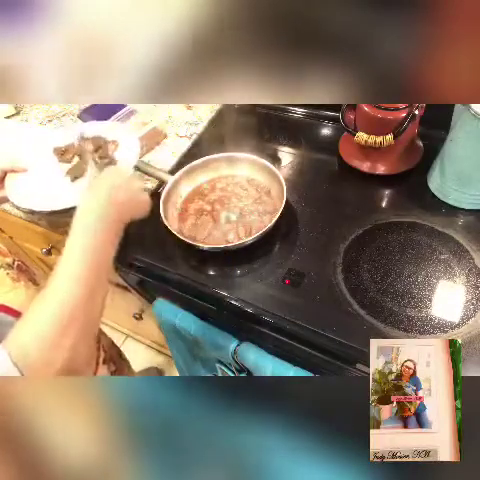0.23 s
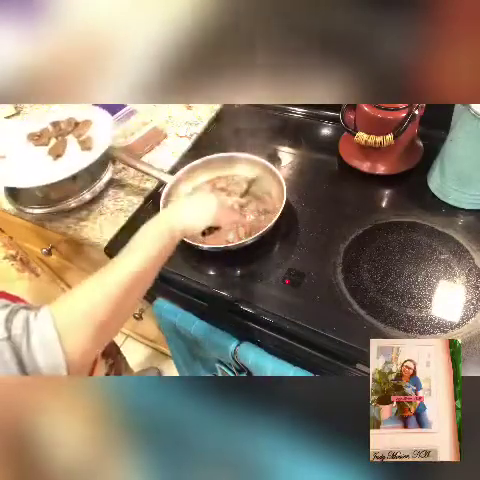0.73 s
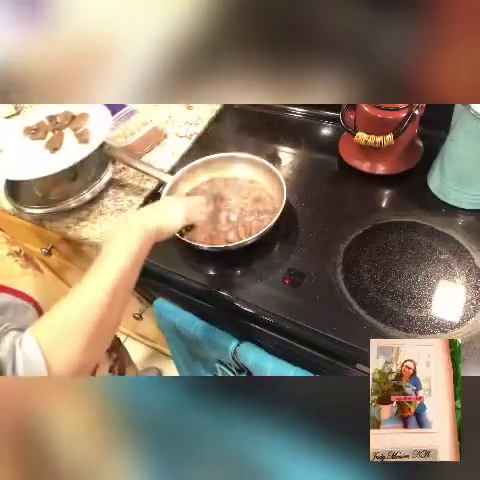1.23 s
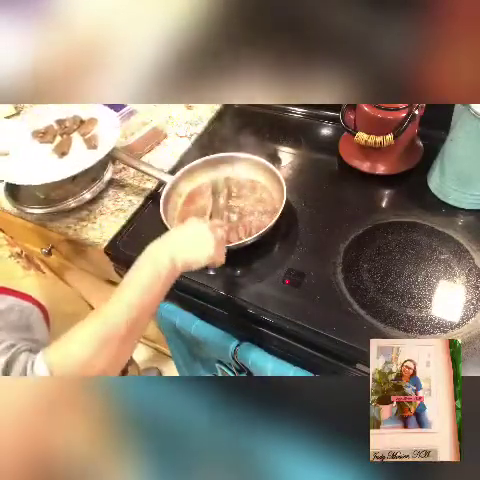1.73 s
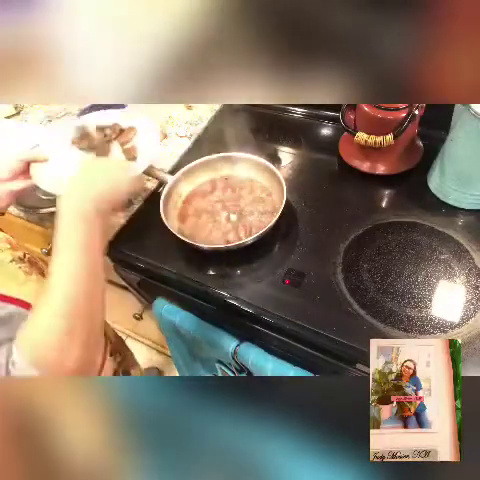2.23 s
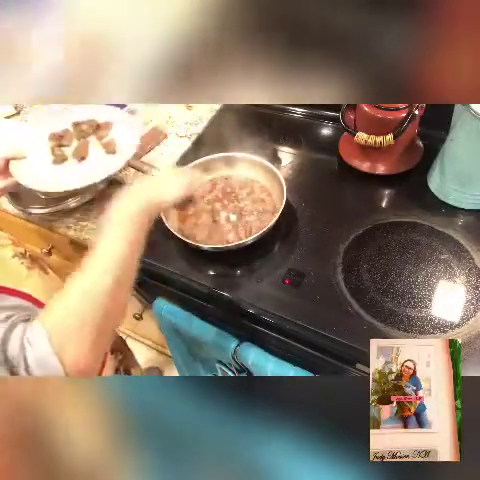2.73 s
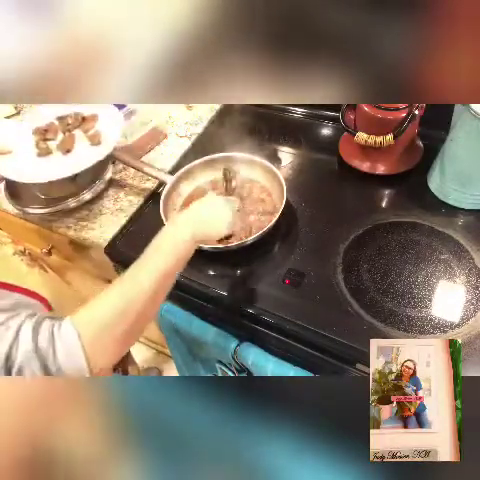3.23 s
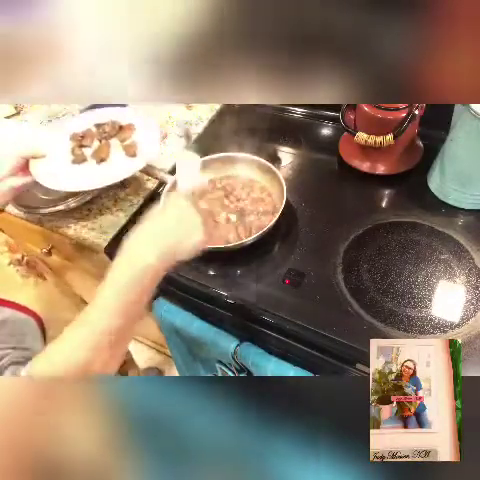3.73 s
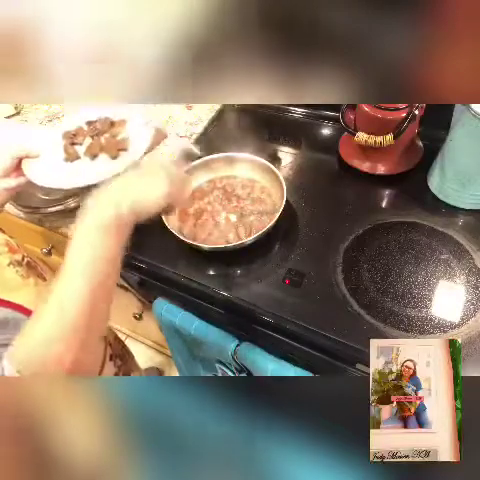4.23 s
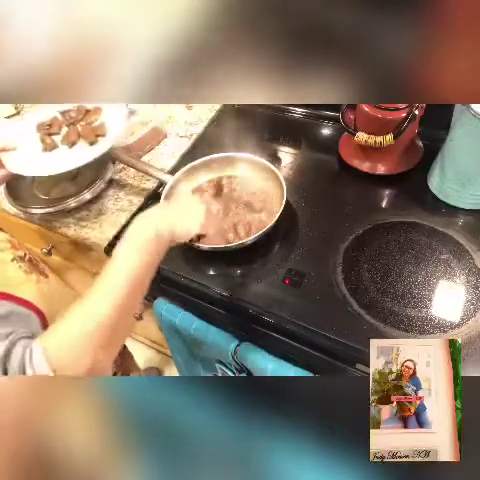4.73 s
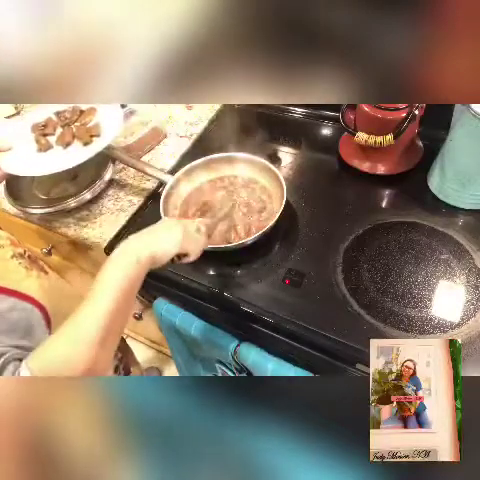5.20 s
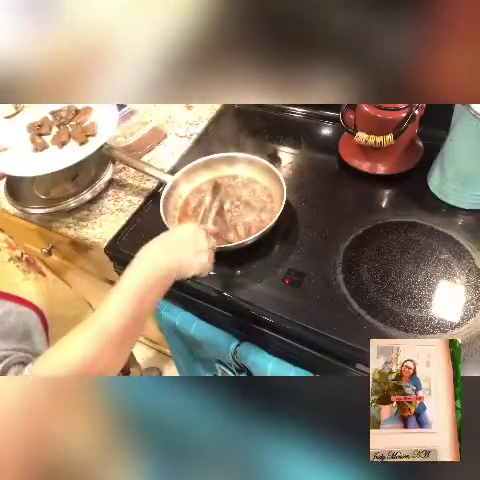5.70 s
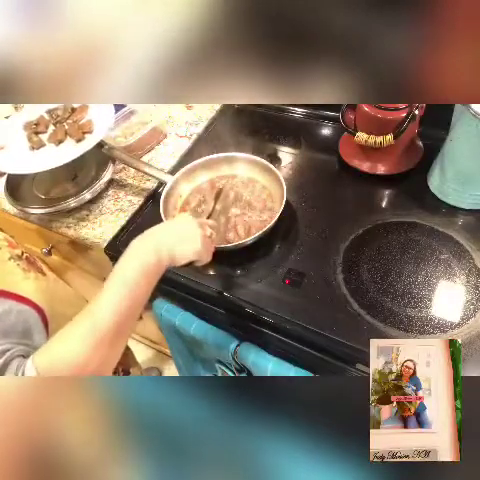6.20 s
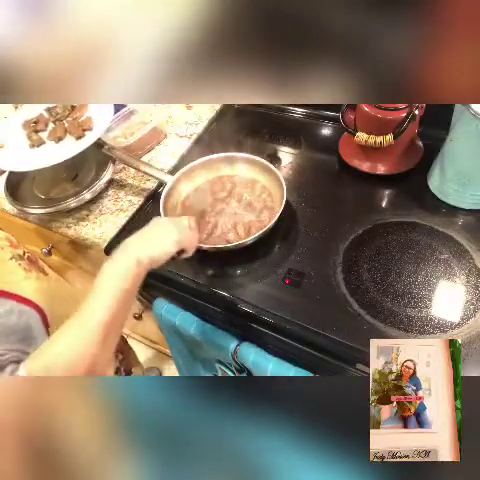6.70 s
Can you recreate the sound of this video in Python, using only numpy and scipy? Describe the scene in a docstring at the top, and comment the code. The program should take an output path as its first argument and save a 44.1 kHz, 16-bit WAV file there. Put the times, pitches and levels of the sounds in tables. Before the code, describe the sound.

In a small kitchen, steel tongs click sharply on a frying pan in irregular bursts, with quiet sizzling and low room noise beneath.

```python
"""Steel tongs move meat from a china plate into a skillet in a small kitchen, over low room noise and hum.
Oil sizzles faintly throughout as bursting bubbles, with stray spits as short broad resonances.
First the tongs knock once on the plate, whose damped modes ring, and the oil soon flares up.
Then they tap the skillet (crack, clatter, ringing steel, pan wall, hob thud) and at times scrape over it.
Near the end a faint, rising low tone swells twice."""
import sys
import numpy as np
from scipy import signal
from scipy.fft import rfft
from scipy.io import wavfile
from scipy.ndimage import uniform_filter1d

SR = 44100
rng = np.random.default_rng(int(sys.argv[2]) if len(sys.argv) > 2 else 0)


def log_audio(samples):
    """Write samples as a 16-bit WAV file to the path given in sys.argv[1]."""
    # one column per channel
    frames = np.atleast_2d(samples).T
    # limit to full scale, then quantise
    limited = np.clip(frames, -1, 1)
    pcm = np.round(limited * 32767).astype(np.int16)
    wavfile.write(sys.argv[1], SR, pcm)


N = 306495
TIME = np.arange(N) / SR   # time in the scene (s)
AGE = np.arange(SR // 2) / SR   # time since a contact (s)


def from_db(db):
    """Level and amplitude: 20 dB is a factor of ten in gain."""
    return 10 ** (np.asarray(db) / 20)


def rms_one(x):
    """Normalisation: scale to unit rms."""
    return x / np.sqrt(np.mean(x ** 2) + 1e-20)


def at_hz(points, hz):
    """Logarithmic frequency scale: interpolate a table along it."""
    f, value = np.transpose(points)
    return np.interp(np.log(np.maximum(hz, 1)), np.log(f), value)


def colour(x, spectrum, tilt_db=0):
    """Spectral shaping: multiply by a spectrum, tilted by so many dB an octave; unit rms."""
    hz = np.maximum(np.fft.rfftfreq(len(x), 1 / SR), 1)
    gain = from_db(at_hz(spectrum, hz) + tilt_db * np.log2(hz))
    return rms_one(np.fft.irfft(rfft(x) * gain, len(x)))


def dying(t60, rise=1e-5):
    """Exponential decay: builds while the contact lasts, then falls 60 dB in each t60."""
    return (1 - np.exp(-AGE / rise)) * np.exp(-np.log(1000) * AGE / t60)


def swell(start, length, attack, t60):
    """Envelope: rises linearly over the attack, holds until the length is up, then decays exponentially."""
    rise = np.clip((TIME - start) / attack, 0, 1)
    return rise * np.exp(-np.log(1000) * np.maximum(TIME - start - length, 0) / t60)


def add(track, s, sound):
    """Superposition: add a sound to the track at time s."""
    start = max(round(s * SR), 0)
    track[start:start + len(sound)] += sound[:max(N - start, 0)]


def even_noise(envelope, width_hz):
    """Spectral whitening: under the envelope, every band of this width carries about the same energy."""
    noise = rng.standard_normal(len(AGE))
    bins = max(int(width_hz * len(AGE) / SR), 1)
    for _ in range(2):
        power = uniform_filter1d(np.abs(rfft(noise * envelope)) ** 2, bins)
        noise = np.fft.irfft(rfft(noise) / np.sqrt(power), len(AGE))
    return rms_one(noise)


def crowd(spectrum, t60, rise, tilt_db=0):
    """High modal density: modes too dense to tell apart act as noise, struck and dying together."""
    envelope = dying(t60, rise)
    noise = even_noise(envelope, width_hz=450)
    return colour(noise, spectrum, tilt_db) * envelope


SCATTER_DB = 1   # standard deviation of each mode's level from strike to strike


def ring(modes, rise, favoured_hz=None):
    """Modal superposition: damped sines; the point of contact may favour modes near one pitch."""
    hz, db, t60 = np.transpose(modes)[:, :, None]
    db = db + SCATTER_DB * rng.standard_normal(hz.shape)
    if favoured_hz:
        octaves_away = np.log2(hz / favoured_hz)
        db = db + 8 / (1 + (octaves_away / 0.077) ** 2)
    sines = np.sin(2 * np.pi * (hz * AGE + rng.random(hz.shape)))   # random phases
    return np.sum(from_db(db) * dying(t60, rise) * sines, axis=0)


def grains(per_s, spread_db):
    """Poisson-like impulses: random clicks of either sign, most of them small and a few large."""
    sizes = from_db(spread_db * np.minimum(rng.exponential(1, N), 5)) * rng.choice([-1, 1], N)
    return sizes * (rng.random(N) < per_s / SR)


def tick(centre_hz, octaves, t60):
    """Heavily damped resonance: a tiny contact or burst makes one broad spectral hump."""
    hz = np.geomspace(100, SR / 2, num=40)
    hump = -10 * np.log10(1 + (np.log2(hz / centre_hz) / octaves) ** 4)
    return crowd(np.column_stack([hz, hump]), t60, rise=0.00027, tilt_db=-2.0)


# spectrum of the room noise: f/Hz, level per Hz/dB
AIR_SPECTRUM = [(27, -38), (45, 5), (90, -5), (125, 1), (200, -10), (330, -4), (460, -14), (750, -6.5),
                (900, 0.5), (1130, -6.5), (1420, -2.5), (1950, -10.5), (3000, -9), (8000, -23.5)]
# swells of a faint low tone: start t/s, length/s, level/dB
TONE_SWELLS = [(5.72, .23, -67.5), (6.11, 0.35, -65)]
TONE_HZ, TONE_RISE_HZ_PER_S = 273, 23   # pitch as the first swell starts, and its steady rise
TONE_ATTACK_S, TONE_RELEASE_T60_S = 0.05, .5


def background():
    """Stationary noise with tonal components: room noise, a trace of mains hum and a faint rising tone."""
    air = from_db(-57.0) * colour(rng.standard_normal(N), AIR_SPECTRUM)
    hum = from_db(-74.0) * np.sin(2 * np.pi * 120 * TIME)
    hz = TONE_HZ + TONE_RISE_HZ_PER_S * (TIME - TONE_SWELLS[0][0])
    level = sum(from_db(db) * swell(s, length, TONE_ATTACK_S, TONE_RELEASE_T60_S)
                for s, length, db in TONE_SWELLS)
    tone = level * np.sin(2 * np.pi * np.cumsum(hz) / SR)
    return air + np.sqrt(2) * (hum + tone)   # root two: the sines' levels are rms


# reverberation time of the room: f/Hz, t60/s
ROOM_T60 = [(120, 0.33), (400, 0.36), (1400, 0.37), (3000, 0.42), (6000, 0.33), (10000, 0.3), (16000, 0.22)]


def kitchen(x, wet_db, build_s):
    """Reverberation: diffuse reflections thicken over milliseconds, then each band decays at its own rate."""
    edges = np.geomspace(70, 18000, num=10)   # band edges (Hz)
    diffuse = rfft(even_noise(dying(t60=.38, rise=build_s), width_hz=45))
    hz, tail = np.fft.rfftfreq(len(AGE), 1 / SR), 0
    for low, high in zip(edges, edges[1:]):
        band = np.fft.irfft(diffuse * ((hz >= low) & (hz < high)), len(AGE))
        tail = tail + band * dying(at_hz(ROOM_T60, np.sqrt(low * high)), build_s)
    return x + from_db(wet_db) * signal.fftconvolve(x, tail / np.linalg.norm(tail))[:N]


OIL_DB = -59   # steady frying
STIR_DB, STIR_T60_S = -72.5, 1.9   # extra frying after each tap has moved the meat
# the oil flares as wet meat meets the hot steel: t/s, level/dB, t60/s
FLARES = [(.795, -49, 0.38), (2.2, -68, 5.0), (5.04, -58.5, 0.8)]
FLARE_ATTACK_S = 0.026


def frying_vigour():
    """Amplitude modulation: steady frying, livelier after every tap and flaring where wet meat lands."""
    stirred = sum(swell(s, FLARE_ATTACK_S, FLARE_ATTACK_S, STIR_T60_S) for s, *_ in TAPS)
    flares = sum(from_db(db) * swell(s, FLARE_ATTACK_S, FLARE_ATTACK_S, t60) for s, db, t60 in FLARES)
    return from_db(OIL_DB) + from_db(STIR_DB) * np.minimum(stirred, 1) + flares


# spectrum of the frying: f/Hz, level per Hz/dB
SIZZLE_SPECTRUM = [(800, 4), (1800, 4), (3000, 1), (4700, -3), (6500, 1), (10400, -8.5), (14500, -2),
                   (16500, -9)]


def sizzle():
    """Bubble noise: tiny steam bubbles burst in the oil; sparser ones each ping at a pitch of their own."""
    fizz = colour(grains(per_s=9000, spread_db=1.0), SIZZLE_SPECTRUM)
    bursts = grains(per_s=600, spread_db=3.1)
    pitches = np.geomspace(2200, 15000, num=24)   # Hz
    dealt = rng.integers(0, len(pitches), N)   # which pitch each burst gets
    pings = np.zeros(N)
    for k, hz in enumerate(pitches):
        b, a = signal.iirpeak(min(hz, .45 * SR), 16, fs=SR)
        own_bursts = bursts * (dealt == k) + 1e-18   # the offset only avoids denormal numbers
        pings += signal.lfilter(b, a, own_bursts) / np.sqrt(hz)
    pings = colour(pings, SIZZLE_SPECTRUM, tilt_db=1.5)
    return frying_vigour() * (.85 * fizz + .52 * pings)


SPITS_PER_S, SPIT_T60_S = 4, 0.018
SPIT_MAX_DB, SPIT_RANGE_DB = -50.5, 8   # the largest spit; how far the smallest lies below it
SPIT_LOW_HZ, SPIT_HIGH_HZ, SPIT_OCTAVES = 6000, 13900, 0.42   # span of centres; width of each


def spits():
    """Random impulsive sources: droplets of fat burst, each with its own moment, size and pitch."""
    out = np.zeros(N)
    for when, size, pitch in rng.random((round(SPITS_PER_S * N / SR), 3)):
        hz = SPIT_LOW_HZ * (SPIT_HIGH_HZ / SPIT_LOW_HZ) ** pitch
        gain = from_db(SPIT_MAX_DB + SPIT_RANGE_DB * (size - 1))
        add(out, when * N / SR, gain * tick(hz, SPIT_OCTAVES, SPIT_T60_S))
    return out


# light touches and loud spits of fat: t/s, level/dB, centre f/Hz, width/octaves, t60/s
TICKS = [(.7557, -31.5, 9000, 2.5, 0.019), (0.8392, -39, 9000, 1.4, .04), (1.326, -45, 1660, 0.23, .11),
         (2.6387, -38.5, 15000, 0.66, 0.017), (2.9608, -42.5, 2200, .96, 0.11),
         (4.3468, -41, 6500, .32, .015), (4.993, -39, 1900, 0.5, 0.038), (5.4257, -40, 2700, 0.59, 0.023),
         (5.9105, -26, 7200, 1.5, 0.02)]


def ticks():
    """Damped transients: the light touches and spits that stand out."""
    out = np.zeros(N)
    for s, db, centre_hz, octaves, t60 in TICKS:
        add(out, s, from_db(db) * tick(centre_hz, octaves, t60))
    return out


# distinct modes of the china: f/Hz, level/dB, t60/s
PLATE_MODES = [(740.5, -13, 0.22), (1326, -1, 0.1), (1374, -3, 0.074), (1487, -4.5, 0.055),
               (1531, -0.5, 0.065), (1650, -5, 0.065), (1852, -20, 0.12), (2225, -9.5, 0.066),
               (2630, -7, .07), (2665, 8, 0.048), (2690, -17, .1), (3400, -3.5, 0.064), (3596, -6, 0.14),
               (3820, -23, 0.1), (5600, -20, .15), (7060, -10, 0.079)]
# spectrum of the tips skidding on the china: f/Hz, level per Hz/dB
PLATE_CLATTER = [(150, -32), (520, -36), (730, -9), (1020, -34), (1400, 1.5), (1750, -0.5), (2000, -13),
                 (2700, -14), (3500, -0.5), (4600, -17.5), (5600, -2.5), (7100, -7.5), (8800, -21),
                 (16000, -14.5)]
KNOCK_S = .0858
KNOCK_CLATTER_DB, KNOCK_RING_DB = -11.5, -19.5   # tongs on the plate


def plate():
    """Impact excitation: one hard knock; the tips skid for a moment and the china's modes ring."""
    out = np.zeros(N)
    add(out, KNOCK_S, from_db(KNOCK_CLATTER_DB) * crowd(PLATE_CLATTER, t60=0.04, rise=0.0012))
    add(out, KNOCK_S, from_db(KNOCK_RING_DB) * ring(PLATE_MODES, rise=0.00075))
    return out


# tips dragged over the pan after a tap: start t/s, length/s, level/dB
DRAGS = [(1.245, 0.064, -54), (1.334, 0.038, -53.5), (2.918, 0.017, -51), (4.55, 0.067, -36)]
DRAG_ATTACK_S, DRAG_RELEASE_T60_S = 0.016, .04


def scrape():
    """Stick-slip friction: rapid slips excite the same steel as a tap does, damped by the pressing tips."""
    slips = rms_one(grains(per_s=2400, spread_db=0.5))
    force = sum(from_db(db) * swell(s, length, DRAG_ATTACK_S, DRAG_RELEASE_T60_S)
                for s, length, db in DRAGS)
    steel = ring(STEEL_MODES, rise=0.00037) * dying(t60=0.018)
    rung = signal.fftconvolve(slips * force, steel / np.linalg.norm(steel))[:N]
    rasp = colour(slips, ARM_CLATTER, tilt_db=-1.6) * force
    return from_db(-2.0) * rasp + from_db(-2.0) * rung


# tongs on the skillet: t/s, strength level/dB, tilt/(dB per octave), clatter t60/s,
# crack level re strength/dB, pan wall level re strength/dB, favoured f/Hz
TAPS = [(1.184, -20.5, 2, 0.055, 6, -8.5, 3380), (1.1947, -27, -2, .05, -6.5, -16, 1650),
        (1.3704, -19, -1, 0.033, -6, -16, 2450), (2.857, -18.5, -0.8, 0.052, 2, -21, 3390),
        (3.0355, -13, -0.5, 0.048, 1, -19.5, 4100), (4.5336, -13, 0, 0.043, -1.5, -16, 3250),
        (5.1578, -23, -2, 0.046, -2.5, -6.5, 3040), (5.431, -39.5, -3, 0.059, -13, -4.5, 6300),
        (6.6192, -15.5, 1.9, 0.03, -14, -35, 3400), (6.624, -22, -1.5, 0.071, -7, -28, 2860),
        (6.7234, -29.5, 0.5, 0.056, -0.5, -7, 8900)]
# first instant of contact: f/Hz, level per Hz/dB
CRACK_SPECTRUM = [(300, -4), (1500, 2), (4000, 2.5), (8000, 0), (11000, 5), (14000, -3), (16500, -32)]
# crowded, quickly damped modes of the tong arms: f/Hz, level per Hz/dB
ARM_CLATTER = [(150, -41), (450, -14.5), (760, -14), (1550, -7.5), (2050, -9), (3100, 1.5), (4300, 2.5),
               (4900, -4), (5800, 3), (9400, -1.5), (11000, -8.5), (14000, -5.5), (16500, -17)]
# ringing of steel on steel: f/Hz, level/dB, t60/s
STEEL_MODES = [(1087, -6, 0.11), (1433, -12, 0.26), (1730, -14, 0.15), (2470, 7.5, 0.049),
               (3010, -6, 0.094), (2960, 7, 0.095), (3200, 5, 0.069), (3426, 4.5, 0.093), (3570, -8, .1),
               (4080, -2, 0.065), (4280, 6, 0.08), (4400, 4, 0.095), (5070, -2, 0.078), (5230, -2, 0.087),
               (5510, 10.5, 0.069), (5600, -6, .11), (6060, 11, 0.055), (6300, -7, .11), (6500, -25, .09),
               (6850, -13, .09), (7800, -24, .09), (8400, -9, 0.074), (8900, -1, 0.082), (9370, 4, 0.083),
               (9900, -11, .1)]
# clack of the pan wall: f/Hz, level per Hz/dB
PAN_WALL = [(200, -5), (470, -12), (780, -23), (920, 2.5), (1080, 6), (1250, -3), (1600, 0), (2000, -9),
            (2450, 4.5), (4000, -7.5), (9000, -52)]
# glass hob under the pan: f/Hz, level/dB, t60/s
HOB_MODES = [(127, -2, 0.089), (151.4, 2.5, 0.1), (196.5, -4.5, 0.16), (249.5, 0, 0.081), (287.3, -1, 0.13),
             (473.5, -4.5, 0.095), (615, -9, 0.11)]
RING_DB = -25.5   # ringing of the steel, re the strength of the tap
THUD_DB, THUD_FOLLOWS = -31, 0.62   # thud of the hob under a tap of 0 dB; dB of thud per dB of strength


def taps():
    """Coupled structures: a crack, then arms, steel and pan wall sound, and the hob answers more slowly."""
    out = np.zeros(N)
    for s, db, tilt_db, t60, crack_db, wall_db, favoured_hz in TAPS:
        crack = crowd(CRACK_SPECTRUM, t60=0.0096, rise=.0001)
        clatter = crowd(ARM_CLATTER, t60, rise=0.0004, tilt_db=tilt_db)
        steel = ring(STEEL_MODES, rise=0.00082, favoured_hz=favoured_hz)
        wall = crowd(PAN_WALL, t60=0.07, rise=0.00044)
        thud = ring(HOB_MODES, rise=0.0037)
        add(out, s, from_db(db + crack_db) * crack)
        add(out, s, from_db(db) * clatter)
        add(out, s, from_db(db + RING_DB) * steel)
        add(out, s, from_db(db + wall_db) * wall)
        add(out, s, from_db(THUD_DB + THUD_FOLLOWS * db) * thud)
    return out


def scene():
    """Superposition: all sources at the stove share the kitchen's reverberation, over the background."""
    stove = plate() + taps() + ticks() + scrape() + sizzle() + spits()
    return (kitchen(stove, wet_db=-10.5, build_s=0.0023) + background())[None]


CUTOFF_HZ = 15900


def record(dry):
    """Low-pass filtering: an elliptic filter cuts the top steeply."""
    return signal.sosfilt(signal.ellip(10, .2, 80, CUTOFF_HZ, fs=SR, output="sos"), dry)


dry = scene()
out = record(dry)
log_audio(out)
```